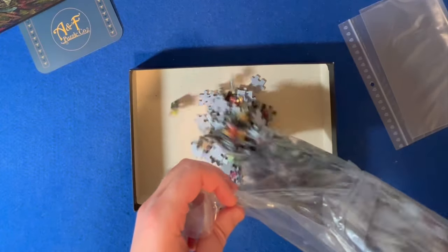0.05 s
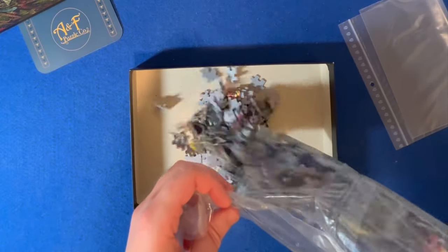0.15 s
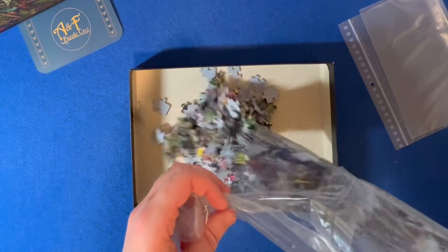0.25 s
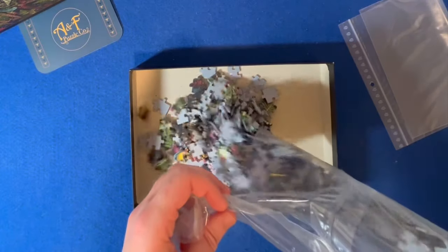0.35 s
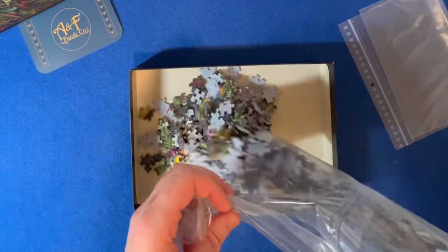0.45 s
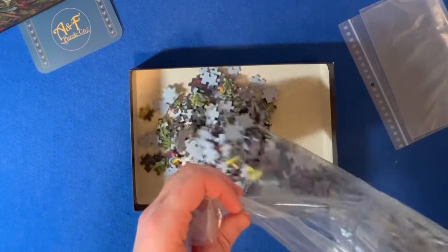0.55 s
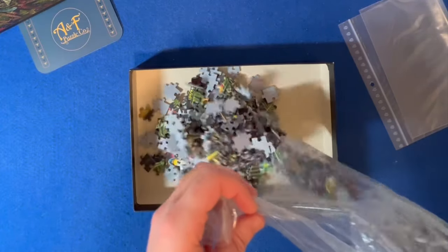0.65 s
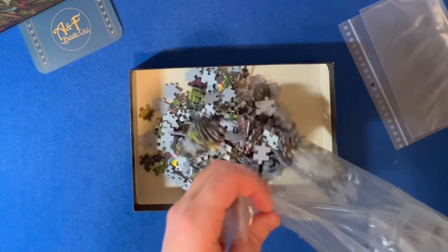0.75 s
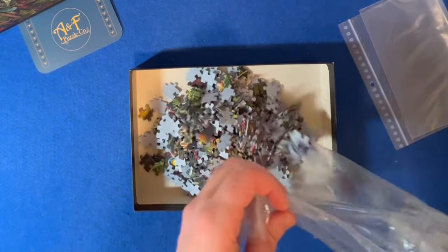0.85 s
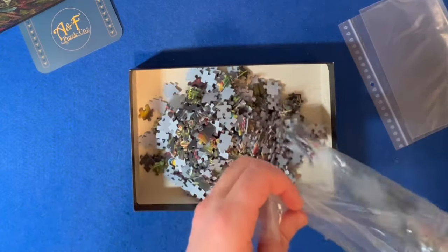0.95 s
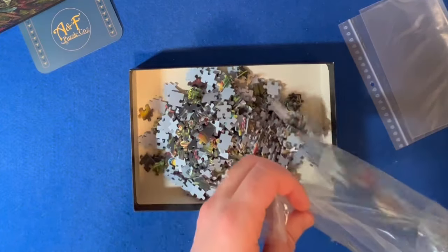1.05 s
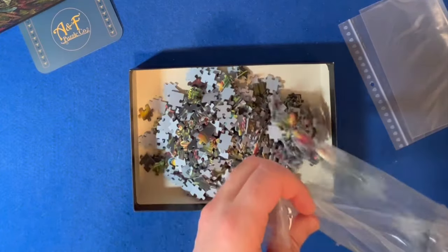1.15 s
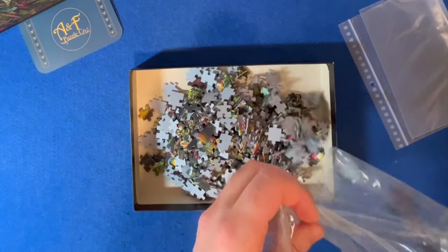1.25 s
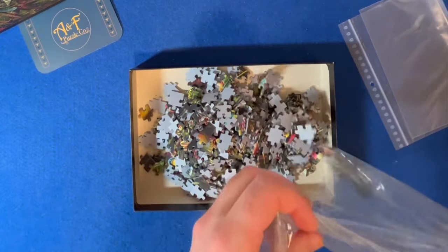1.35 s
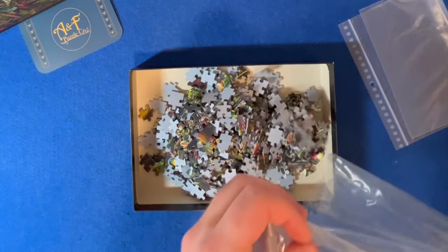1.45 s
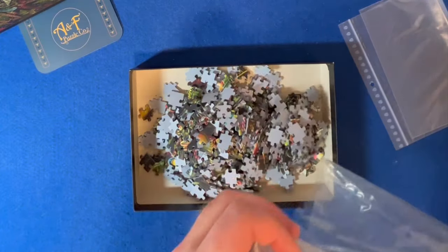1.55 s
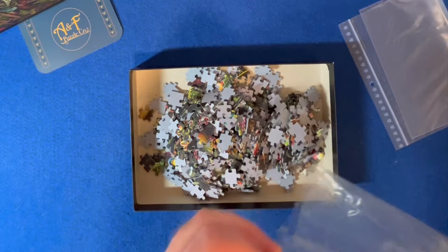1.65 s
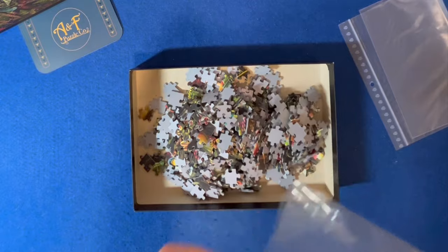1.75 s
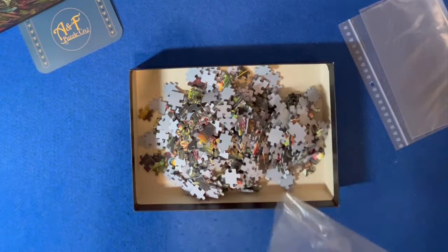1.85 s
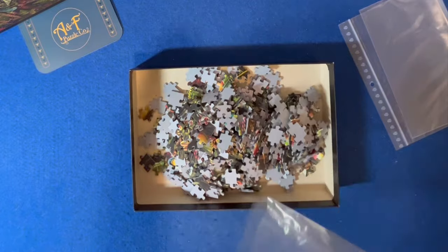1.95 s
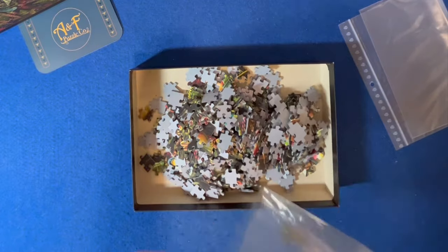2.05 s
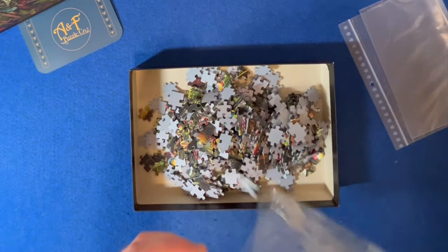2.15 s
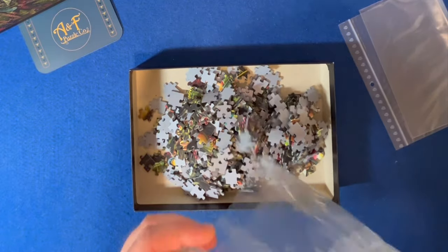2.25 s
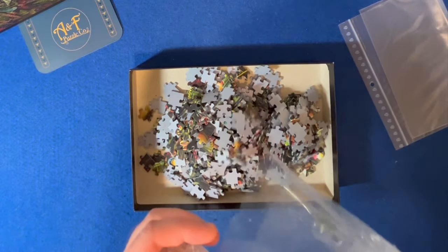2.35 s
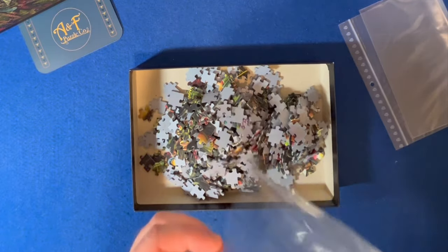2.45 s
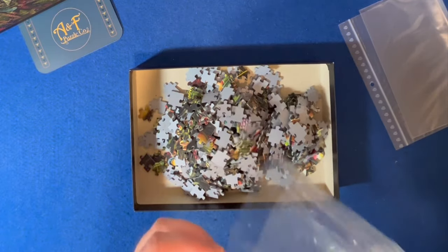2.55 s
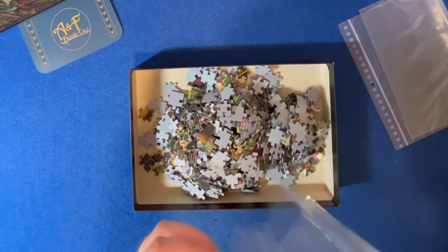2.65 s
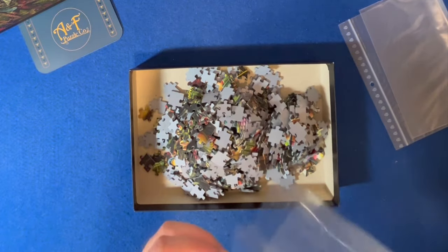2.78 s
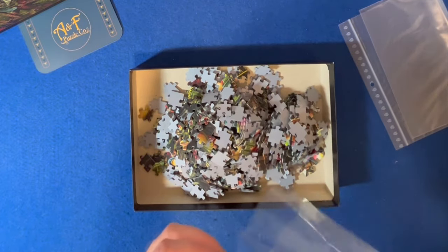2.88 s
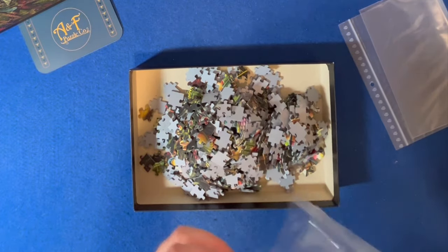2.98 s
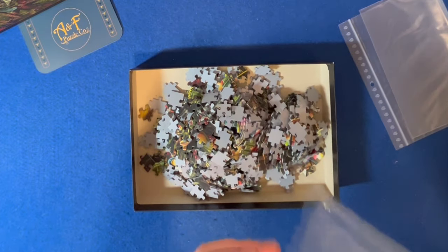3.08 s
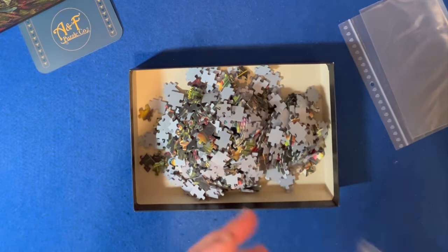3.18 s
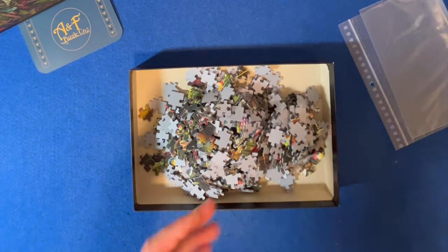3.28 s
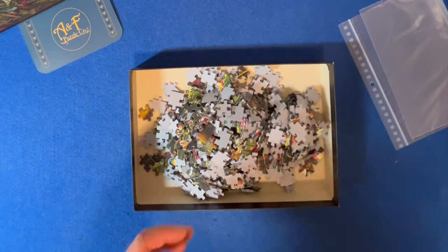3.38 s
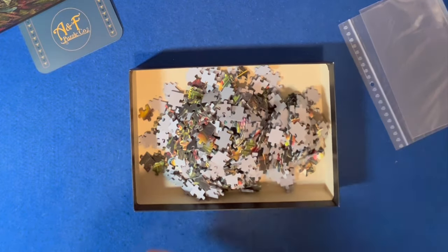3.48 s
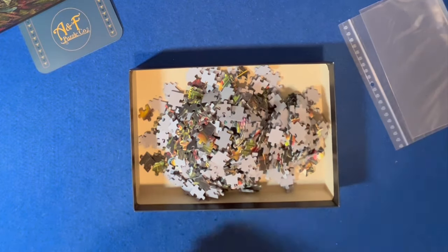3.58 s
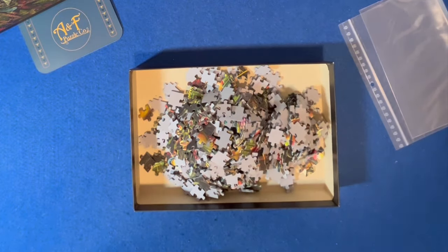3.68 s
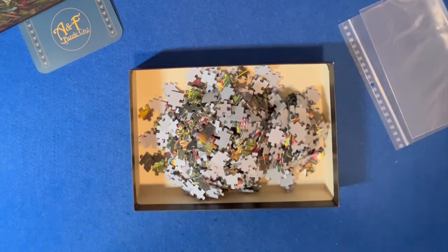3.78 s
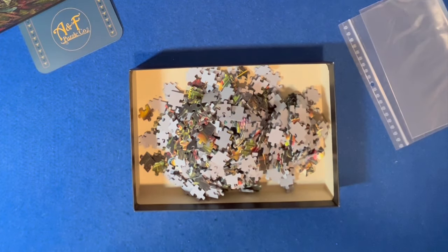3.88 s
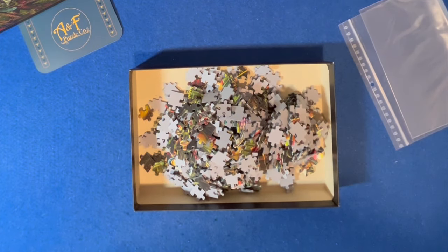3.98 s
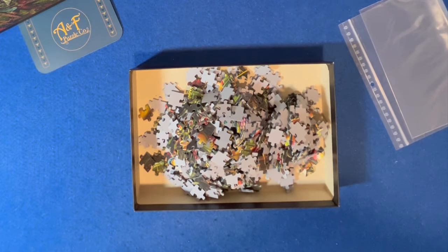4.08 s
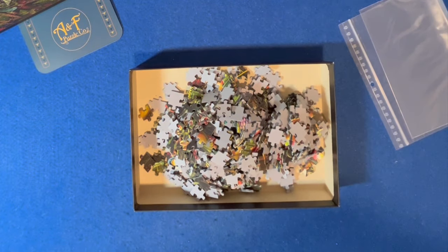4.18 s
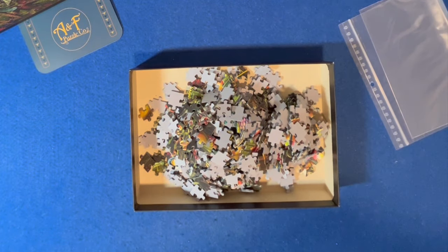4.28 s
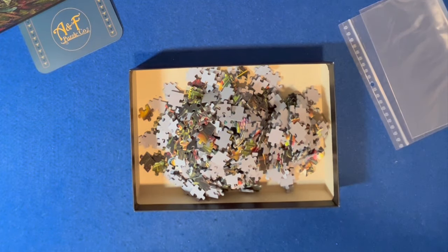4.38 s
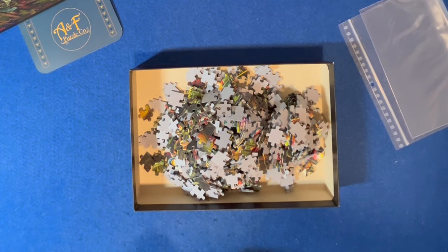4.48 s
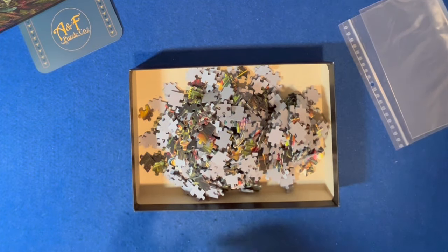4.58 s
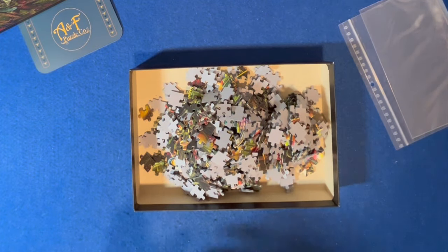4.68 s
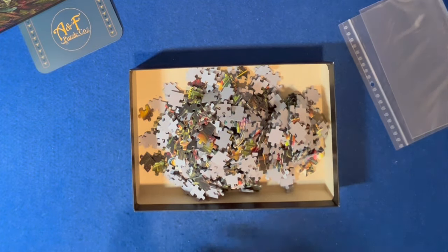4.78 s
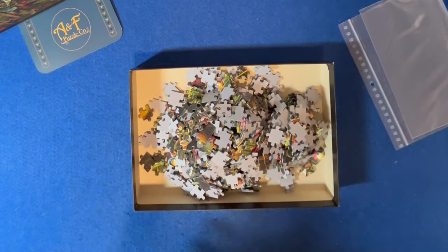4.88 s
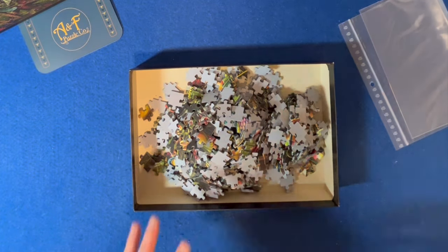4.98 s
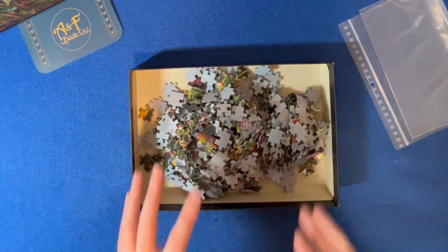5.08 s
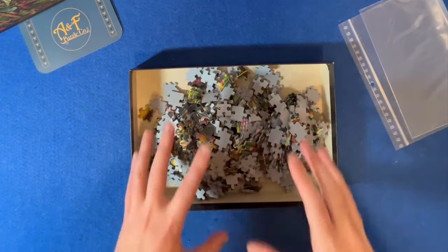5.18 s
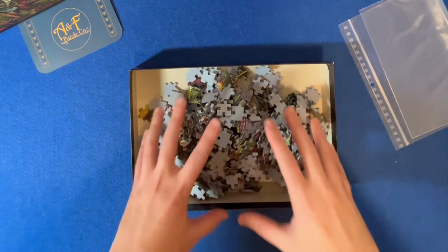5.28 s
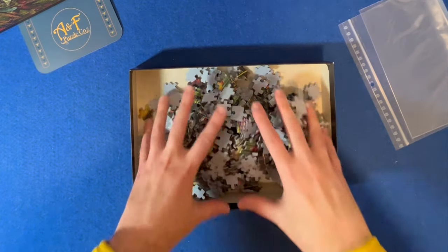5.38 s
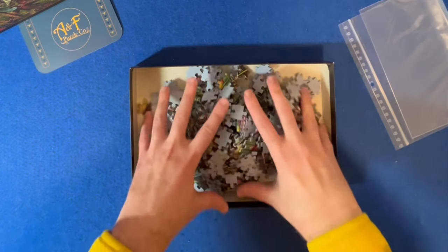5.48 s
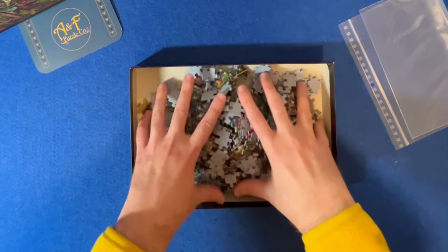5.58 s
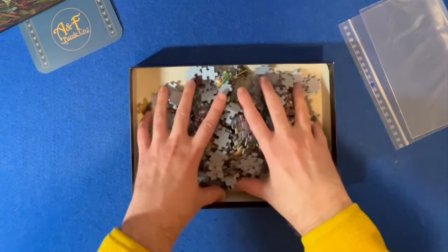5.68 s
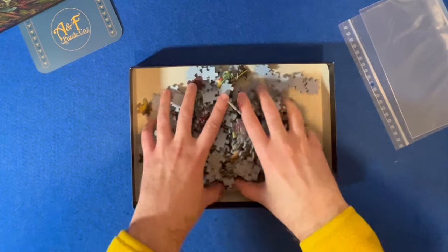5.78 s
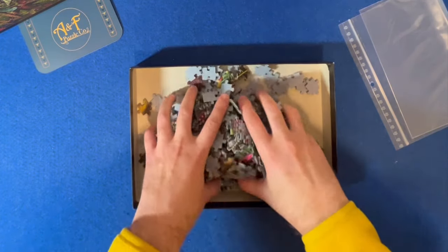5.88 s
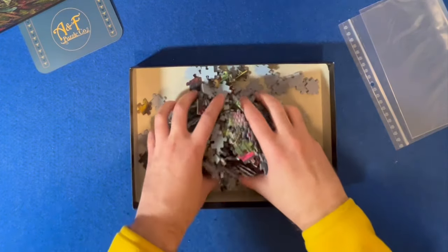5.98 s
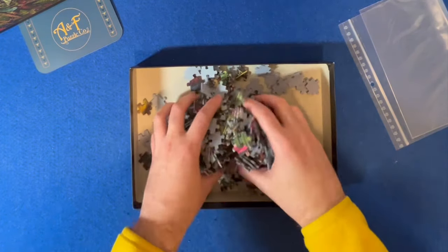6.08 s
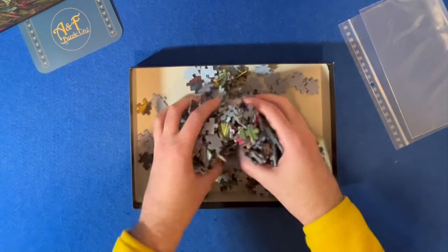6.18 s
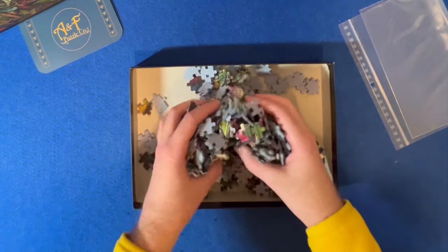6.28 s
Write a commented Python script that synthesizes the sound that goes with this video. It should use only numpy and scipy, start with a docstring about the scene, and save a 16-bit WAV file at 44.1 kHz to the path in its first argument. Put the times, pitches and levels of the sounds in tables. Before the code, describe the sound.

Cardboard jigsaw pieces clatter from a plastic bag into a shallow box, the empty bag crackles, then hands stir the heap in a quiet room.

```python
"""Cardboard jigsaw pieces slide from a plastic bag into a shallow cardboard box; later, hands stir the heap.
Pieces: damped tone bursts with noise ticks for taps and cut edges; box: random hits into resonant modes.
Empty bag, shaken, crumpled and put aside: dense resonant clicks, sharper snaps, pops and squeaks.
Bumps, a juddering heap and a table knock mark the hands; a small room, two close microphone ports above."""
import sys
import numpy as np
from scipy import signal
from scipy.fft import rfft, irfft, next_fast_len
from scipy.io import wavfile
from scipy.ndimage import uniform_filter1d

SR = 44100
rng = np.random.default_rng(int(sys.argv[2]) if len(sys.argv) > 2 else 0)


def wav_out(sig):
    """Save sig, one row per channel (or a flat mono array), as 16-bit PCM at SR to the path in sys.argv[1]."""
    wavfile.write(sys.argv[1], SR, np.round(np.clip(np.atleast_2d(sig).T, -1, 1) * 32767).astype(np.int16))


N = 279594

# Levels in event tables are before the layer's trim.
# loudest pieces landing or flipping: (time [s], level [dB], pitch [Hz], edge tick level re clack [dB],
# swell of the flexing [s])
CLACKS = [(0.005, -27, 1726, -15, 0.00148), (0.0091, -10, 1650, -9, 0.0014),
          (0.0224, -21, 1700, -26, 0.0018), (0.0269, -15, 1710, -25, 0.00084),
          (0.0319, -23, 1710, -23.5, 0.0013), (0.0392, -15.5, 1730, -20, 0.0013),
          (0.0457, -20, 2000, -26, 0.00085), (0.0495, -24, 1800, -22, 0.0011),
          (0.0558, -18, 1716, -28.5, 0.0024), (0.06, -22.5, 1640, -24, 0.0021),
          (0.0713, -23, 1670, -20, 0.0016), (0.0791, -18.5, 1730, -20, 0.0019),
          (0.097, -20, 1770, -23, 0.0015), (0.1021, -13, 1620, -30.5, 0.0016),
          (0.112, -17, 1697, -32, 0.0014), (0.1175, -19, 1530, -24.5, 0.0011),
          (0.1251, -18, 1690, -17.5, 0.0015), (0.144, -21.5, 1830, -21.5, 0.0012),
          (0.1484, -23, 1750, -20, 0.00087), (0.152, -25, 1740, -20, 0.00093),
          (0.1562, -17, 2140, -20, 0.00136), (0.1622, -18, 1700, -20, 0.0014),
          (0.1674, -16, 1750, -20, 0.0012), (0.1733, -10.5, 1570, -11, 0.0015),
          (0.1792, -22.5, 1796, -20, 0.0012), (0.1951, -17, 1624, -27, 0.0014),
          (0.2111, -20, 1910, -20.5, 0.00086), (0.2142, -15.5, 1810, -4, 0.0014),
          (0.2295, -22.5, 1830, -20, 0.0009), (0.2341, -21, 1709, -20.5, 0.0009),
          (0.237, -18, 2089, -21.5, 0.001), (0.2465, -23, 1772, -20.5, 0.0013),
          (0.2508, -16, 1805, -10, 0.00142), (0.263, -21.5, 2056, -20.5, 0.0011),
          (0.2837, -17.5, 2100, -7.5, 0.0009), (0.2953, -17, 1935, -21, 0.00085),
          (0.335, -22.0, 2140, -16.5, 0.00092), (0.3528, -14.5, 2060, -2.5, 0.00089),
          (0.365, -15.5, 2046, -9, 0.00064), (0.4026, -25.5, 1700, -3, 0.0029),
          (0.4179, -27, 2074, 4, 0.00088), (0.4548, -27.5, 1660, -6, 0.0015),
          (0.4698, -25, 1980, -9, 0.00067), (0.4744, -28, 1666, -20, 0.0009),
          (0.4876, -25.5, 1810, -14.5, 0.00077), (0.5338, -24.5, 1945, -18.5, 0.00086),
          (0.5399, -18.5, 2130, -5.5, 0.00058), (0.5528, -20, 1683, -15, 0.00076),
          (0.5579, -21.5, 1955, -13, 0.00079), (0.583, -22, 2140, -2.5, 0.00062),
          (0.6185, -24.5, 1903, -11.5, 0.00083), (0.6428, -28.0, 1710, -19, 0.002),
          (0.651, -21.5, 1580, -17, 0.00102), (0.6542, -23.5, 1908, -21.5, 0.00125),
          (0.6578, -15, 1657, -25, 0.0011), (0.6714, -27, 1690, -20, 0.001),
          (0.715, -12, 1877, -23, 0.00066), (0.7182, -17.5, 1830, -14, 0.001),
          (0.7223, -17.5, 1790, -23, 0.00127), (0.7452, -11, 1740, -26.5, 0.000866),
          (0.756, -19, 1870, -20, 0.0008), (0.7593, -11.5, 1830, -25.5, 0.0014),
          (0.7635, -13, 1780, -25, 0.001), (0.7696, -12.5, 1920, -14.5, 0.00252),
          (0.7764, -16, 1815, -14, 0.00148), (0.7806, -16.5, 2060, -20, 0.00073),
          (0.7841, -18, 1880, -20, 0.00225), (0.8172, -20.5, 1760, -19.5, 0.0015),
          (0.8457, -18, 1775, -10, 0.0019), (0.936, -21, 1907, -6, 0.0012),
          (0.9468, -24, 1800, -22, 0.0011), (0.9508, -25, 1928, -6.5, 0.00214),
          (0.9883, -23.5, 1820, -2.5, 0.00082), (1.0304, -30.5, 1800, -15, 0.00078),
          (1.0672, -25.5, 1623, -4, 0.0014), (1.1234, -28.0, 1710, -17.5, 0.00116),
          (1.1299, -23, 1890, -22, 0.0008), (1.1407, -28.5, 1890, -18.5, 0.00071),
          (1.1612, -21.0, 1500, -22.5, 0.0029), (1.1857, -26.5, 1860, -13, 0.0012),
          (1.2402, -28, 1790, -4.5, 0.0013), (1.2824, -26.5, 1940, -5, 0.00094),
          (1.29, -24.5, 1740, -14, 0.0007), (1.3001, -19, 1950, -24, 0.00039),
          (1.3026, -32, 2050, -20, 0.0011), (1.3452, -28, 1960, -13, 0.00059),
          (1.352, -29.5, 1824, -16, 0.00066), (1.3585, -33, 1900, -12.5, 0.00085),
          (1.4297, -39, 1705, -20, 0.0016), (1.433, -46, 1790, -20, 0.0011),
          (1.4675, -37.5, 1910, -19.5, 0.0008), (1.4745, -33.5, 1930, -21, 0.00074),
          (1.4783, -37.5, 1810, -20, 0.00082), (1.483, -35, 1880, -20.5, 0.00078),
          (1.4868, -36.5, 1840, -18, 0.0008), (1.4909, -28.5, 1945, -22, 0.0008),
          (5.405, -41, 1970, -19, 0.0021), (5.4081, -37, 1930, -7, 0.00096),
          (5.447, -28.5, 1724, -8.5, 0.0009), (5.4495, -32, 1700, -20, 0.0007),
          (5.4544, -40, 1680, -20, 0.00185), (5.5256, -43.0, 1820, -20, 0.00085),
          (5.5457, -33.5, 1840, -14, 0.0009), (5.5633, -50, 1950, -20, 0.00102),
          (5.6319, -42, 1730, -22.5, 0.00157), (5.6371, -37.5, 1910, -20, 0.00061),
          (5.709, -38.5, 1700, -2, 0.000614), (5.7466, -28, 1800, -20, 0.0015),
          (5.7576, -21, 2080, -26.5, 0.00084), (5.7857, -22.5, 2080, -7, 0.0011),
          (5.827, -24.5, 1990, 0.5, 0.0014), (5.835, -35, 2160, -18.5, 0.0009),
          (5.8445, -33, 2040, -20, 0.00355), (5.8494, -27, 2050, -20, 0.00095),
          (5.8548, -30, 1950, -18.5, 0.00091), (5.953, -20, 2140, -16.5, 0.00077),
          (5.9822, -20.5, 1920, -26.5, 0.0006), (5.9859, -24.5, 2116, -20, 0.00074),
          (6.0109, -28, 2100, -13, 0.00087), (6.0162, -29, 2130, -22.5, 0.0014),
          (6.0314, -29, 1990, -20, 0.001), (6.0436, -32.5, 1970, -20, 0.001),
          (6.0745, -34, 1820, -20, 0.001), (6.0785, -29, 2060, -20, 0.0011),
          (6.0956, -38.5, 1800, -20, 0.0011), (6.1108, -31.5, 1980, 0, 0.0015),
          (6.126, -32.5, 1730, -18.5, 0.0029), (6.1307, -38, 1810, -20, 0.00135),
          (6.1476, -30, 2080, 0, 0.001), (6.1619, -38.5, 1880, -20, 0.00102),
          (6.1891, -29, 1980, -20, 0.0013), (6.2488, -28.5, 2020, -25, 0.001),
          (6.2631, -26.0, 1810, -7, 0.00112), (6.3295, -28, 1900, -2, 0.0021)]
# thin stream of pieces until the bag is empty:
# (time [s], clatter level [dB], edge ticks re clatter [dB], box drumming re clatter [dB])
TRICKLE = [(0, -47.5, -11, -3.5), (0.5, -43.5, -10, -3.5), (0.7, -42, -8, -2), (1.08, -53.5, -5.5, 7.5),
           (1.31, -50.5, -6, 2), (1.4, -57, -13, -1), (1.54, -55.5, -37, 1.5), (1.68, -89.5, -17, 1)]
# clumps sliding out of the bag: (time [s], hold [s], clatter level [dB])
CLUMPS = [(0.0, 0.24, -29.5), (0.236, 0.13, -32.5), (0.539, 0.006, -38.5), (0.67, 0.015, -38),
          (0.764, 0.015, -27), (0.818, .14, -35.5), (1.127, 0.061, -40.5), (1.481, 0.016, -47.5)]
CLUMP_ATTACK_S, CLUMP_RELEASE_S = 0.073, 0.18
CLUMP_EDGE_DB, CLUMP_BOX_DB = -14, -10  # re clatter
# hands pushing the heap:
# (time [s], hold [s], clatter level [dB], edge ticks re clatter [dB], box drumming re clatter [dB])
PUSHES = [(5.371, 0.045, -54.5, -10.5, 1), (5.439, 0.019, -49.5, -11, 2.5),
          (5.511, 0.23, -57.5, -12.5, 1.5), (5.696, 0.0306, -47.5, -8.5, -1), (5.756, 0.097, -40, -11.5, 0),
          (5.941, 0.0914, -41, -13, 1.5), (6.073, 0.37, -40.5, -16.5, -6)]
PUSH_ATTACK_S, PUSH_RELEASE_S = 0.095, 0.37
PIECE_RING_S = 0.0045
# spectrum of a cut edge ticking or scraping: (frequency [Hz], density [dB per Hz])
EDGE = [(700, -18.5), (1500, -6), (2500, 9.5), (3100, 7), (4000, 0.5), (5000, -0.5), (5900, 1.5),
        (7800, -4), (9200, -0.5), (10200, -8.5), (11800, -5.5), (13300, -15.5), (14600, -13.5),
        (16000, -17.5)]
# spectrum of a piece tapping its neighbour: (frequency [Hz], density [dB per Hz])
TAP = [(150, -19.5), (450, -1.5), (900, 0), (1600, -6.5), (3000, -4.5), (5000, -17), (16000, -41)]
# box floor resonances: (frequency [Hz], width [Hz], level [dB])
BOX_MODES = [(66, 26, 2), (92, 24, -1), (119, 24, 1.5), (163, 31, -6), (243, 34, -1.5), (315, 34, -4),
             (374, 17, 3), (520, 130, -12), (742, 50, -11.5), (836, 70, -14), (1100, 200, -14.5)]
# clumps and hands bumping the box:
# (time [s], level [dB], pitch of the push [Hz], contact noise level re push [dB])
BUMPS = [(0.15, -36.5, 223.7, -16.5), (0.654, -38, 270, -23), (0.77, -35.5, 256, 7),
         (1.17, -44, 110.6, -16), (3.694, -57, 133.7, -11), (4.431, -58.5, 142.6, -0.5),
         (5.356, -51.5, 110.7, -9), (5.42, -47, 99.65, -18.5), (5.532, -44.5, 91, -8.5),
         (5.738, -34, 88, -4), (5.815, -38.5, 109.9, -8)]
# spectrum of skin meeting cardboard: (frequency [Hz], density [dB per Hz])
TOUCH = [(100, -16), (300, -31), (800, 1), (1600, -3), (2500, -4.5), (4000, -24), (12000, -52),
         (16000, -62)]
# heap juddering over the box floor: (time [s], length [s], level [dB])
JUDDERS = [(5.342, 0.2, -49.5), (5.824, 0.099, -36), (5.9, 0.285, -45)]
# an arm knocks the table as the hands reach in
KNOCK_S, KNOCK_DB = 5.1805, -48.5
# table top resonances: (frequency [Hz], level [dB], t60 [s])
TABLE_MODES = [(81.7, -1.5, 0.29), (151.4, -3.5, 0.12), (239, -2, 0.13), (548, -3, 0.052),
               (768.5, 0.5, 0.0364), (1420.3, 0, 0.031), (1700, 4, 0.0153), (2245, 0, 0.033)]
# tugs that shake out and gather the empty bag:
# (time [s], hold [s], rustle level [dB], fizz re rustle [dB], flapping re rustle [dB])
TUGS = [(1.818, 0.024, -56.5, -5.5, -2), (1.915, 0.034, -50, -18, -1), (1.989, 0.015, -51, -22, 2.5),
        (2.073, 0.117, -48, -7, -6.5), (2.134, 0.083, -50, -2, -5), (2.237, 0.076, -46, 1.5, -4.5),
        (2.39, 0.017, -49, -16, -8), (2.492, 0.015, -45.5, -1.5, -2), (2.56, 0.02, -48.5, -23, -2),
        (2.632, .04, -48.5, -25, -1), (2.729, 0.013, -51, -23, 1.5), (2.815, 0.006, -48, -26, 1),
        (2.91, 0.049, -68.5, -17.5, 12.5), (2.989, 0.011, -46.5, -6.5, -4), (3.105, 0.016, -50, 3.5, -13.5),
        (3.181, 0.02, -52, -20, -3)]
TUG_ATTACK_S, TUG_RELEASE_S = 0.035, 0.055
# rustle while the bag is held, tipped, shaken empty, lifted away and gathered:
# (time [s], hold [s], rustle level [dB], fizz re rustle [dB], flapping re rustle [dB])
HELD = [(1.03, 0.23, -59.5, 18, 3.2), (1.46, 0.097, -71.5, 0, 14.6), (1.69, 0.087, -74.5, 3.5, 1.6),
        (1.838, 1.2, -59, -4.5, 0.78)]
# bag sliding and settling as it is laid aside:
# (time [s], hold [s], rustle level [dB], fizz re rustle [dB], flapping re rustle [dB])
SETTLES = [(3.511, 0.046, -79.5, -0.5, -8.5), (3.635, 0.015, -78, 3.5, -6),
           (3.685, 0.026, -60.5, -10.5, -5.5), (3.902, 0.18, -89.5, 4.5, 2), (4.06, 0.046, -75, 2.5, -4.5),
           (4.11, 0.0336, -65, -14, 0.5), (4.186, 0.042, -65, -0.5, -1), (4.288, 0.044, -59, -1.5, -4),
           (4.43, 0.0094, -67.5, -20, 1)]
SETTLE_ATTACK_S, SETTLE_RELEASE_S = 0.038, 0.18
# loudest bag creases snapping through: (time [s], level [dB], body level re crack [dB])
SNAPS = [(0.1214, -26.5, 11.5), (0.263, -24.5, -14), (0.4106, -29, -2), (0.836, -26, -18),
         (1.037, -28.5, -18.5), (1.1058, -28.5, -8), (1.1427, -26.5, -25), (1.2044, -28.5, -39),
         (1.258, -37, -27.5), (1.3239, -36.5, -6), (1.4266, -30, -11), (1.447, -31.5, -17.5),
         (1.5227, -41.5, -12.5), (1.6834, -62, -1), (1.8898, -42.5, -0.5), (1.919, -47, -1),
         (1.93, -28.5, 2), (1.969, -48, 3), (2.0655, -40.5, 6), (2.167, -36.5, -6), (2.2405, -32, -2.5),
         (2.2654, -44, -8.5), (2.3489, -39.5, 8.5), (2.5029, -33, -1), (2.5881, -53, 14), (2.657, -47, 10),
         (2.7194, -47.5, 11.5), (2.828, -46, -8), (2.9908, -37, 6), (3.0038, -36, 9.5), (3.1109, -46, 13),
         (3.3307, -66, 15), (4.182, -49.5, 4), (4.2876, -46.5, 3)]
# slack bag panels popping over: (time [s], level [dB], pitch [Hz])
FOLDS = [(1.813, -44, 700), (1.833, -46, 813), (1.9308, -32, 3000), (1.989, -47, 1540), (1.994, -35, 777),
         (2.005, -39, 795), (2.0175, -41, 2500), (2.135, -30, 1420), (2.1425, -28.5, 910),
         (2.173, -40, 1600), (2.286, -28.5, 1042), (2.4876, -41, 2090), (2.502, -45, 800),
         (2.551, -30, 1700), (2.5641, -28.5, 1940), (2.648, -29, 3200), (2.66, -36, 800),
         (2.679, -29, 1945), (2.741, -35, 1190), (2.829, -35, 1430), (2.911, -44, 1290),
         (3.0035, -36, 1310), (3.111, -35, 2350), (3.188, -34, 1757), (3.332, -47, 2850)]
# film rubbing on film: (time [s], length [s], level [dB], pitch [Hz])
SQUEAKS = [(1.4, 0.0222, -32, 8800), (2.264, 0.008, -33, 7700), (2.274, 0.13, -48, 8560),
           (2.34, 0.0206, -30.5, 8800), (2.692, 0.035, -57, 12300), (2.86, 0.049, -52, 8680)]
# spectrum of crinkling film: (frequency [Hz], density [dB per Hz])
FILM = [(120, -27.5), (200, 1.5), (424, 0.5), (620, 0), (850, -1.5), (1140, -2.5), (1710, -4), (2290, -2.5),
        (4000, -5), (5130, -7.5), (6170, -7.5), (8740, -30), (10100, -27.5), (11900, -30.5), (14600, -29.5),
        (16000, -30)]
# spectrum of a fizzing or cracking crease: (frequency [Hz], density [dB per Hz])
CREASE = [(1500, -21.5), (3500, -18), (5000, -2.5), (6200, -2), (8300, -1), (10200, -3), (12000, -4),
          (14500, -15.5), (16000, -19)]
# spectrum of the flapping sheet: (frequency [Hz], density [dB per Hz])
FLAP = [(20, -23.5), (40, -0.5), (75, 5.5), (130, -2), (220, -2.5), (400, -13.5), (900, -53.5)]
# early echoes off box walls and table: (frequency [Hz], gain [dB])
SCATTER = [(60, -24), (250, -12), (500, -5), (1200, -14), (2200, -7), (4000, -6), (8000, -11), (14000, -9)]
# diffuse room reflections: (frequency [Hz], gain [dB])
ECHO = [(60, -22.5), (200, -11), (350, -8.5), (520, 0), (900, -0.5), (1500, -7), (3000, -5.5), (6000, -8.5),
        (14000, -18)]
ROOM_T60_S, ROOM_TREBLE_T60_S = 0.24, 0.27
# spectrum of the quiet room: (frequency [Hz], density [dB per Hz])
HUSH = [(12, -30), (30, -6), (65, 0), (140, -4), (300, -19), (700, -26), (2000, -32), (8000, -41),
        (13000, -45), (14500, -54), (16000, -66)]
HUSH_DB = -70
# phase between the ports: (frequency [Hz], lead of left [rad])
PORT_PHASE = [(100, 0), (470, -.9), (950, .9), (1500, 0), (2600, 2.5), (3700, 1.1), (4900, 2.1),
              (6300, 3.6), (9700, 9), (16000, 16.3)]
# level between the ports: (frequency [Hz], left minus right [dB])
PORT_BALANCE = [(60, 4), (110, -4), (200, -3.5), (380, -5), (700, -1.5), (1290, 1), (2380, -2.5),
                (4400, -3), (8120, 0), (15000, -1)]
TOP_HZ = 15900
TIME = np.arange(N) / SR  # s
FFT_SIZE = 2 * next_fast_len(N // 2 + SR)
FREQS = np.maximum(np.arange(FFT_SIZE // 2 + 1) * SR / FFT_SIZE, 1)  # Hz


def pieces(rows, ring_s, ring_db, tap_db, edge_db, tick_s):
    """Each piece flexes for a few cycles, damped by the heap; it taps its neighbour and its cut edge ticks."""
    body, taps, edges = np.zeros(N), np.zeros(N), np.zeros(N)
    t = TIME[:700]
    for s, db, hz, bright_db, swell_s in rows:
        phase = rng.uniform(0, 2 * np.pi)
        detune = 1 + 0.084 * rng.standard_normal()
        flex = (t / swell_s * np.exp(1 - t / swell_s)) ** 4  # peaks at swell_s
        ring = undb(ring_db) * np.exp(-t / ring_s) * (1 - np.exp(-t / swell_s))
        clack = flex * np.sin(2 * np.pi * hz * t + phase)
        clack += ring * np.sin(2 * np.pi * hz * detune * t + phase)
        tick = burst(tick_s)
        add(body, s, undb(db) * clack)
        add(taps, s + swell_s / 2, undb(db + tap_db) * tick)
        add(edges, s + swell_s / 2, undb(db + bright_db + edge_db) * tick)
    return body + filtered(taps, causal(TAP)) + filtered(edges, causal(EDGE))


def tumble(curve, per_s, spread_db, trim_db, edge_db, swell_s):
    """Draw the many small random collisions in a moving heap (columns as in CLACKS)."""
    slots_per_s = 4000
    slots = np.arange(curve[0][0], curve[-1][0], 1 / slots_per_s)
    chance = rng.standard_normal((len(slots), 4))
    hit = rng.random(len(slots)) < per_s / slots_per_s
    size, pitch, sharpness, softness = np.clip(chance[hit], -2, 2).T
    level_db, bright_db, _ = follow(curve, slots[hit])
    piece_db = level_db + trim_db + spread_db * size
    hz = 1650 * np.exp(0.18 * pitch)
    tick_db = bright_db + edge_db + 4.5 * sharpness
    swells_s = swell_s * np.exp(0.3 * softness)
    return np.column_stack([slots[hit], piece_db, hz, tick_db, swells_s])


def heap(curve, drum_db, slide_db, push_hz):
    """Moving pieces drum on changing spots of the box floor, mostly near push_hz, and scrape each other."""
    level_db, bright_db, box_db = follow(curve, TIME)
    force = crackle(per_s=560, spread_db=2.5) * undb(level_db + box_db + drum_db)
    spots = 4
    spot = wander(spots, hold=SR // 20)
    drum = 0
    for k in range(spots):
        push = 1 / (1 + 0.4j * (FREQS / push_hz - push_hz / FREQS))
        response = box_response(uneven_db=4, detune=0.015) * push
        response = response / np.sqrt(np.mean(np.abs(response) ** 2))
        drum = drum + filtered(force * (spot == k), response)
    scrapes = crinkle(per_s=5000, spread_db=0.5, q=3) * undb(level_db + bright_db + slide_db)
    return drum + filtered(scrapes, causal(EDGE))


def box_response(uneven_db=0, detune=0):
    """Box floor: damped modes, power gain 1; spot and load vary their strength and pitch."""
    chance = rng.uniform(-1.4, 1, (len(BOX_MODES), 2))
    h = 0
    for (mode_hz, width_hz, db), (shift, size) in zip(BOX_MODES, chance):
        hz = mode_hz * (1 + detune * shift)
        gain = undb(db + uneven_db * size)
        h = h + gain / (1 + 1j * hz / width_hz * (FREQS / hz - hz / FREQS))
    return h / np.sqrt(np.mean(np.abs(h) ** 2))


def bumps(trim_db, push_s, focus, touch_db, touch_s):
    """An uneven shove wakes the box modes near its own pitch, with a dull pat."""
    thuds, pat = np.zeros(N), np.zeros(N)
    t = TIME[:SR // 5]
    ring = irfft(box_response())[:len(t)]
    for s, db, hz, contact_db in BUMPS:
        band_hz = [hz / (1 + 1 / focus), hz * (1 + 1 / focus)]
        band = signal.butter(2, band_hz, "bandpass", fs=SR, output="sos")
        push = rng.standard_normal(len(t)) * np.exp(-t / push_s)
        shove = signal.sosfilt(band, signal.fftconvolve(push, ring)[:len(t)])
        contact = rng.standard_normal(len(t)) * np.exp(-t / touch_s)
        add(thuds, s, undb(db + trim_db) * unit(shove))
        add(pat, s, undb(db + contact_db + touch_db) * contact)
    return thuds + filtered(pat, causal(TOUCH))


def judder(trim_db, mode_hz, waver, rough_db):
    """The dragged heap keeps one floor mode ringing, unsteady in pitch and level as it sticks and slips."""
    level = np.zeros(N)
    for s, length_s, db in JUDDERS:
        add(level, s, undb(db + trim_db) * signal.windows.tukey(int(length_s * SR), 0.5))
    noise = rng.standard_normal((2, N))
    slow = uniform_filter1d(uniform_filter1d(noise, size=600), size=600)
    drift, grip = unit(slow[0]), unit(slow[1])
    cycles = np.cumsum(mode_hz * (1 + waver * drift)) / SR
    return level * undb(rough_db * grip) * np.sin(2 * np.pi * cycles)


def knock(contact_s, pat_db, pat_s):
    """A soft, short blow rings the table top, with a dull pat of cloth."""
    out = np.zeros(N)
    t = TIME[:SR // 3]
    ring = 0
    for hz, db, t60_s in TABLE_MODES:
        ring = ring + undb(db) * np.exp(-np.log(1000) * t / t60_s) * np.sin(2 * np.pi * hz * t)
    band = signal.butter(3, [150, 2000], "bandpass", fs=SR, output="sos")
    cloth = unit(signal.sosfilt(band, rng.standard_normal(len(t))))
    pat = undb(pat_db) * cloth * np.exp(-t / pat_s)
    add(out, KNOCK_S, undb(KNOCK_DB) * (ring + pat) * (1 - np.exp(-t / contact_s)))
    return out


def bag(curve, per_s, spread_db, rustle_db, fizz_db, flap_db):
    """Thin film buckles in countless crinkles, its creases fizz and the loose sheet flaps."""
    level_db, bright_db, low_db = follow(curve, TIME)
    crinkles = crinkle(per_s, spread_db, q=2.57) * undb(level_db + rustle_db)
    fizz = crinkle(per_s, spread_db, q=2) * undb(level_db + bright_db + fizz_db)
    flaps = crackle(per_s=450, spread_db=0.5) * undb(level_db + low_db + flap_db)
    return filtered(crinkles, causal(FILM)) + filtered(fizz, causal(CREASE)) + filtered(flaps, causal(FLAP))


def crumples(trim_db, decay_s):
    """Each tug or settling starts with a collapsing fold: a dense run of crinkles that dies away."""
    level = np.zeros(N)
    for s, _, db, *_ in TUGS + SETTLES:
        add(level, s, undb(db + trim_db) * np.exp(-TIME[:SR // 4] / decay_s))
    return filtered(crinkle(per_s=5000, spread_db=7, q=2.5) * level, causal(FILM))


def snaps(crack_db, body_db, after_db):
    """A stiff crease pops through with a bright crack, shakes nearby film and settles with a second tick."""
    crack, body = np.zeros(N), np.zeros(N)
    decay_s = 0.0011
    for s, db, low_db in SNAPS:
        after_s = rng.uniform(0.00074, 0.0039)
        add(crack, s + 0.00035, undb(db + crack_db) * burst(decay_s))
        add(crack, s + after_s, undb(db + crack_db + after_db) * burst(2 * decay_s))
        add(body, s + 0.00042, undb(db + low_db + body_db) * burst(decay_s))
    # so small a patch of film radiates almost no bass
    thin = (1j * FREQS / (1100 + 1j * FREQS)) ** 2
    return filtered(crack, causal(CREASE)) + filtered(body, causal(FILM) * thin)


def small_snaps(curve, per_s, trim_db, spread_db, centre_hz, octaves, decay_s, q):
    """Lesser creases pop at random while the film moves, each at its own pitch."""
    out = np.zeros(N)
    slots_per_s = 1000
    slots = np.arange(curve[0][0], curve[-1][0], 1 / slots_per_s)
    chance = np.clip(rng.standard_normal((len(slots), 2)), -2, 2)
    hit = rng.random(len(slots)) < per_s / slots_per_s
    envelope = np.exp(-TIME[:SR // 60] / decay_s)
    level_db = follow(curve, slots[hit])[0]
    for s, db, (size, pitch) in zip(slots[hit], level_db, chance[hit]):
        pop = narrow_burst(centre_hz * 2 ** (octaves * pitch), q, envelope)
        add(out, s, undb(db + trim_db + spread_db * size) * pop)
    return out


def folds(trim_db, decay_s, q):
    """A slack panel of film flips over with a dull pop at a pitch of its own."""
    out = np.zeros(N)
    envelope = np.exp(-TIME[:SR // 30] / decay_s)
    for s, db, hz in FOLDS:
        add(out, s, undb(db + trim_db) * narrow_burst(hz, q, envelope))
    return out


def squeaks(trim_db, q):
    """Film drags over film with a thin, high zip: narrow noise that swells and fades."""
    out = np.zeros(N)
    for s, length_s, db, hz in SQUEAKS:
        envelope = np.hanning(int(length_s * SR) + 3)
        add(out, s, undb(db + trim_db) * narrow_burst(hz, q, envelope))
    return out


def scatter(x, count):
    """Sounds come from all over the box; each spot throws other early echoes to each port."""
    spot = wander(count, hold=SR // 100)
    out = 0
    for k in range(count):
        share = uniform_filter1d((spot == k) * 1., size=88)
        echoes = [signal.oaconvolve(x * share, burst(0.0015))[:N] for port in range(2)]
        out = out + np.array(echoes)
    return filtered(out, undb(read_spectrum(SCATTER)))


def room(x, count):
    """Diffuse reflections as decaying noise, different at each port and for each source place."""
    t = TIME[:SR // 3]
    place = wander(count, hold=SR // 16)
    split = signal.butter(2, 900, fs=SR, output="sos")
    out = 0
    for k in range(count):
        noise = rng.standard_normal((2, len(t)))
        low = signal.sosfilt(split, noise)
        tail = low * undb(-60 * t / ROOM_T60_S) + (noise - low) * undb(-60 * t / ROOM_TREBLE_T60_S)
        tail = unit(tail * (1 - np.exp(-t / 0.003))) / np.sqrt(len(t))
        share = uniform_filter1d((place == k) * 1., size=441)
        out = out + signal.oaconvolve((x * share)[None], tail, axes=1)[:, :N]
    return filtered(out, undb(read_spectrum(ECHO)))


def hush():
    """Quiet room: a low rumble mostly shared by both ports and a faint hiss."""
    mid, side = filtered(rng.standard_normal((2, N)), causal(HUSH))
    side = filtered(side, np.clip(FREQS / 700, 0.2, 1))
    return undb(HUSH_DB) * np.array([mid + side, mid - side])


def gesture(row, attack_s, release_s):
    """One movement as a level curve: swells by 40 dB, holds and dies away."""
    s, hold_s, db, *colour = row
    quiet_db = db - 40
    end_s = s + hold_s
    return [(s - attack_s, quiet_db, *colour), (s, db, *colour),
            (end_s, db, *colour), (end_s + release_s, quiet_db, *colour)]


def together(curves):
    """Overlapping movements add their power, in the main sound and in its bright and low parts."""
    first_s = min(c[0][0] for c in curves)
    last_s = max(c[-1][0] for c in curves)
    t = np.arange(max(np.floor(first_s), 0), min(np.ceil(last_s), N / SR), 0.002)
    power = 0
    for curve in curves:
        db, bright_db, low_db = follow(curve, t)
        power = power + undb([db, db + bright_db, db + low_db]) ** 2
    level, bright, low = 10 * np.log10(power)
    return np.column_stack([t, level, bright - level, low - level])


def follow(curve, t):
    """Columns of a curve at times t; the first is a level, silent outside the curve."""
    s, level_db, *others = np.transpose(curve)
    level = np.interp(t, s, level_db, left=-200, right=-200)
    return [level] + [np.interp(t, s, c) for c in others]


def crinkle(per_s, spread_db, q):
    """Tiny buckles and scrapes ring briefly in eight resonances from low to high; rms 1."""
    centres_hz = np.geomspace(350, 13000, num=8)
    total = 0
    for hz in centres_hz:
        clicks = crackle(per_s * np.sqrt(hz / 2000) / len(centres_hz), spread_db)
        total = total + signal.lfilter(*signal.iirpeak(hz, q, fs=SR), clicks)
    return unit(total)


def crackle(per_s, spread_db):
    """Random clicks of uneven size whose power stays near 1 over a few hundredths of a second."""
    count = int(per_s * N / SR)
    when = rng.integers(0, N, count)
    sign, size = rng.standard_normal((2, count))
    x = np.bincount(when, np.sign(sign) * undb(spread_db * size), N)
    return x / np.sqrt(np.abs(uniform_filter1d(x * x, size=2200)) + 1e-4)


def burst(decay_s):
    """A tiny scrape of dying noise with energy 1."""
    t = TIME[:600]
    x = rng.standard_normal(len(t)) * np.exp(-t / decay_s)
    return x / np.sqrt(np.sum(x ** 2))


def narrow_burst(hz, q, envelope):
    """Noise under an envelope, ringing in one resonance; peak 1."""
    noise = rng.standard_normal(len(envelope)) * envelope
    x = signal.lfilter(*signal.iirpeak(hz, q, fs=SR), noise)
    return x / np.max(np.abs(x))


def wander(count, hold):
    """Index of a random place, redrawn every hold samples."""
    return np.repeat(rng.integers(0, count, N // hold + 1), hold)[:N]


def causal(points):
    """Minimum-phase response of a spectrum, power gain 1 for white sound."""
    size = 8192
    hz = np.arange(size // 2 + 1) * SR / size
    gain = unit(undb(np.interp(hz, FREQS, read_spectrum(points))))
    cepstrum = irfft(np.log(gain))
    # fold the cepstrum onto positive time
    cepstrum[1:size // 2] *= 2
    cepstrum[size // 2 + 1:] = 0
    return np.interp(FREQS, hz, np.exp(rfft(cepstrum)))


def read_spectrum(points):
    """Join (frequency [Hz], value) points on a log-frequency axis."""
    hz, value = np.transpose(points)
    return np.interp(np.log(FREQS), np.log(hz), value)


def filtered(x, response):
    """Apply a frequency response."""
    return irfft(rfft(x, FFT_SIZE) * response)[..., :N]


def add(track, s, sound):
    """Mix a short sound into a track at time s."""
    start = int(np.clip(s * SR, 0, N - 1))
    track[start:start + len(sound)] += sound[:N - start]


def undb(db):
    """Decibels to gain."""
    return 10 ** (np.asarray(db) / 20)


def unit(x):
    """Scale to rms 1."""
    return x / np.sqrt(np.mean(x ** 2))


def scene():
    """Pouring, the bag and stirring, heard directly at two ports, off the box and through the room."""
    clumps = [gesture((*row, CLUMP_EDGE_DB, CLUMP_BOX_DB), CLUMP_ATTACK_S, CLUMP_RELEASE_S)
              for row in CLUMPS]
    pour = together([TRICKLE] + clumps)
    stir = together([gesture(row, PUSH_ATTACK_S, PUSH_RELEASE_S) for row in PUSHES])
    shake = together([gesture(row, TUG_ATTACK_S, TUG_RELEASE_S) for row in TUGS + HELD])
    aside = together([gesture(row, SETTLE_ATTACK_S, SETTLE_RELEASE_S) for row in SETTLES])

    dry = pieces(CLACKS, ring_s=PIECE_RING_S, ring_db=-16, tap_db=0, edge_db=15, tick_s=0.0006)
    small = np.vstack([
        tumble(pour, per_s=400, spread_db=2.5, trim_db=4.5, edge_db=-2.5, swell_s=0.0009),
        tumble(stir, per_s=420, spread_db=2.0, trim_db=3.5, edge_db=-1.5, swell_s=0.0008)])
    dry += pieces(small, ring_s=PIECE_RING_S, ring_db=-16, tap_db=-1, edge_db=18.0, tick_s=0.0005)
    dry += heap(pour, drum_db=0.0, slide_db=3.5, push_hz=297.2)
    dry += heap(stir, drum_db=-0.5, slide_db=4.0, push_hz=233)
    dry += bumps(trim_db=-8.0, push_s=0.04, focus=1.7, touch_db=-1.5, touch_s=0.021)
    dry += judder(trim_db=-1, mode_hz=372.7, waver=0.015, rough_db=2.5)
    dry += knock(contact_s=0.00046, pat_db=-9, pat_s=0.022)

    dry += bag(shake, per_s=1200, spread_db=4.5, rustle_db=-2.5, fizz_db=-9.5, flap_db=1.5)
    dry += bag(aside, per_s=8000, spread_db=3.5, rustle_db=2.5, fizz_db=-3.5, flap_db=-1.0)
    dry += crumples(trim_db=0.5, decay_s=0.011)
    dry += snaps(crack_db=14.5, body_db=19.0, after_db=-5.0)
    dry += small_snaps(shake, per_s=70, trim_db=9.5, spread_db=3.5, centre_hz=1500, octaves=0.9,
                       decay_s=0.0015, q=2.4)
    dry += folds(trim_db=-2.0, decay_s=0.0029, q=3.7)
    dry += squeaks(trim_db=-1, q=14.9)

    lead_rad = np.interp(FREQS, *np.transpose(PORT_PHASE))
    direct = np.array([dry, filtered(dry, np.exp(-1j * lead_rad))])
    return direct + scatter(dry, count=7) + room(dry, count=4) + hush()


def record(dry):
    """The two ports differ a little in colour; the top is cut steeply."""
    half_db = read_spectrum(PORT_BALANCE) / 2
    heard = filtered(dry, undb(np.array([half_db, -half_db])))
    return signal.sosfilt(signal.ellip(8, 0.2, 70, TOP_HZ, fs=SR, output="sos"), heard)


dry = scene()
out = record(dry)
wav_out(out)
```